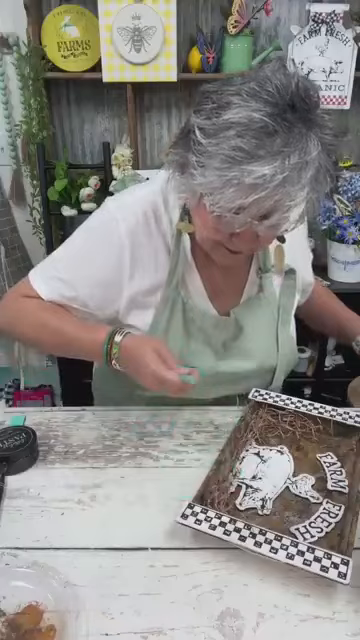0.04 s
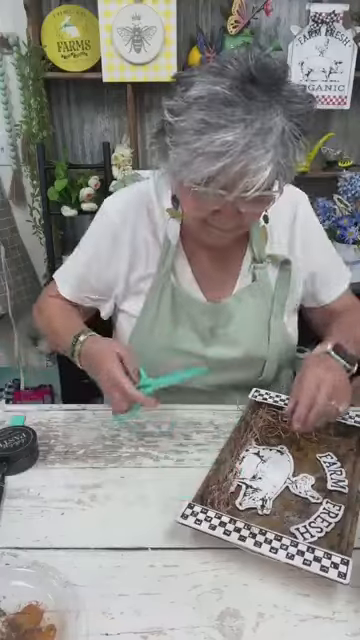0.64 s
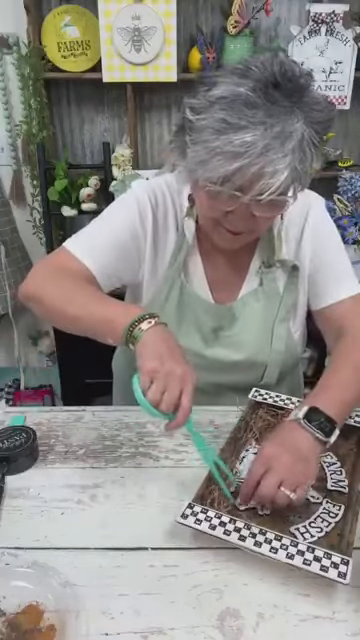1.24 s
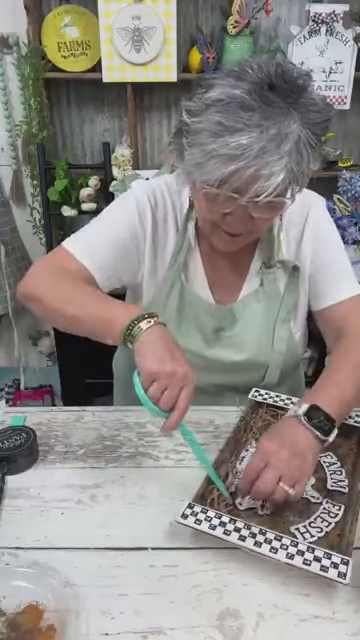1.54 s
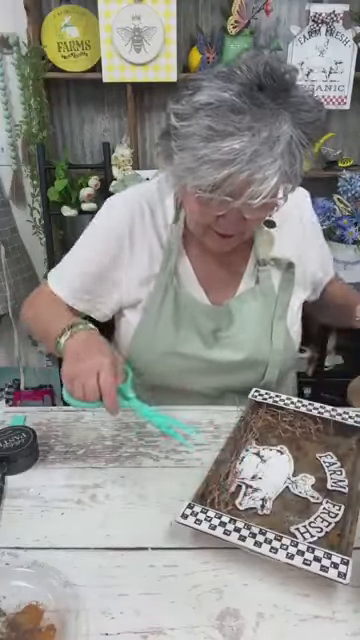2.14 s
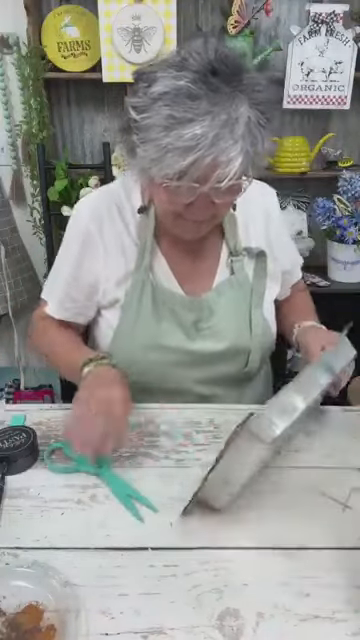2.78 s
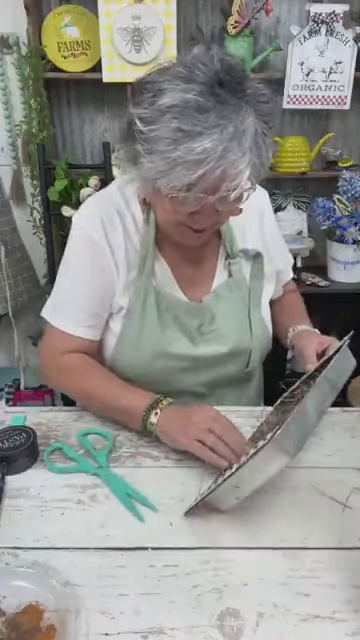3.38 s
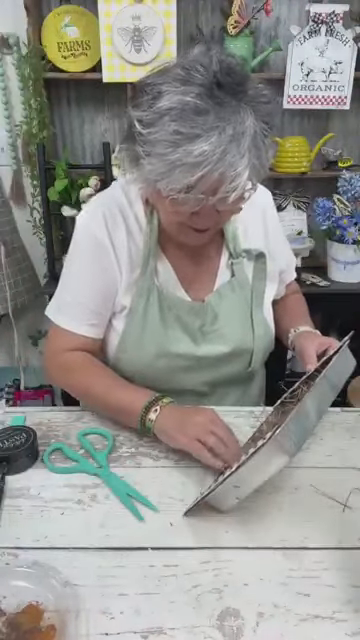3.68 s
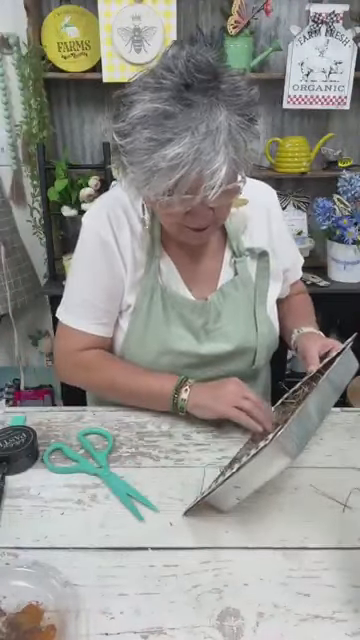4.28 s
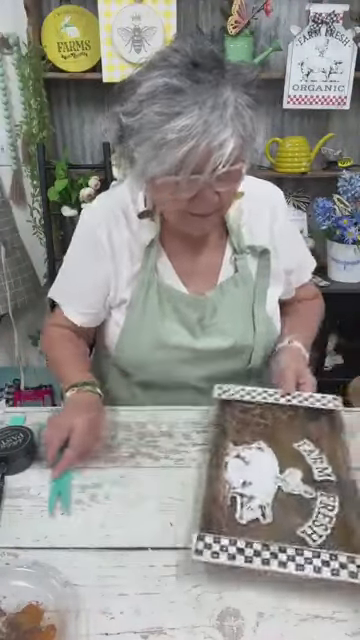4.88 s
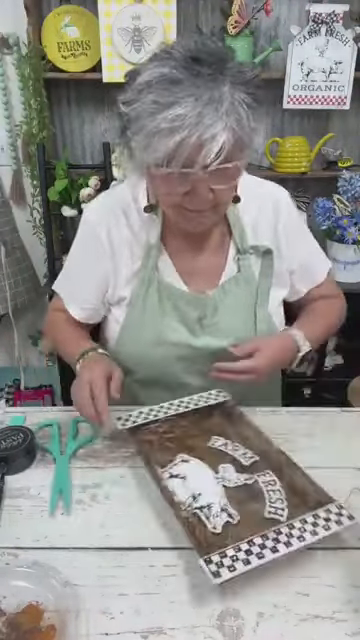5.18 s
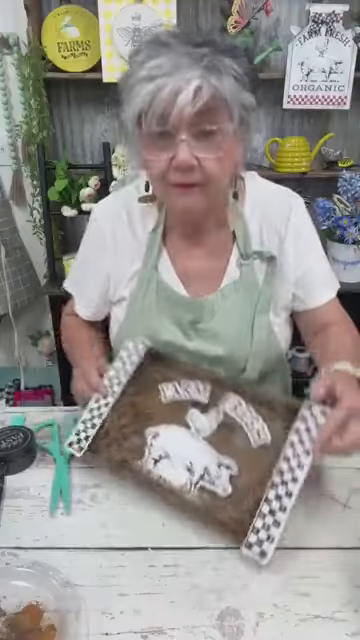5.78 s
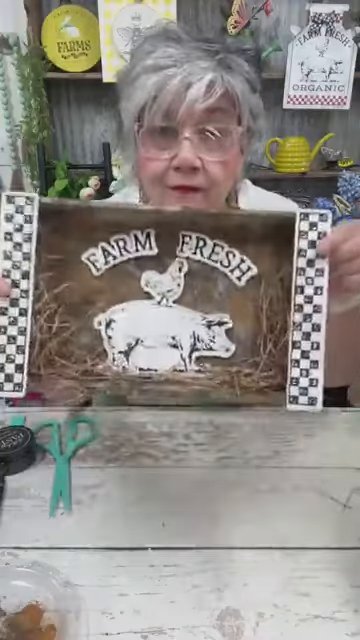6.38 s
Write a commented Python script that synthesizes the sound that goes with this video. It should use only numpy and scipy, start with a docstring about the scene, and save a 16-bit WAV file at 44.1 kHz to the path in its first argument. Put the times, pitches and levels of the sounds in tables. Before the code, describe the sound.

A sharp scissor snip and faint straw rustling, followed by a metal pan clattering on a wooden table in a small room.

```python
"""Craft scissors click open amid faint rustling, snip once and are put down on a wooden table.
A straw-lined metal baking pan is tipped on its edge, brushed out by hand, dropped flat with a clatter
and picked up. Impacts excite the damped modes of blades, pan and table; sliding friction makes the
noise of hands, sleeves and the dragged rim. A fan hums faintly behind, and a small room reverberates."""
import sys
import numpy as np
from scipy import signal
from scipy.fft import rfft, irfft, next_fast_len
from scipy.io import wavfile
from scipy.ndimage import uniform_filter1d

SR = 44100
rng = np.random.default_rng(int(sys.argv[2]) if len(sys.argv) > 2 else 0)


def dump_mix(stems):
    """Bounce the given channels to the path in sys.argv[1] as a 16-bit WAV at rate SR."""
    frames = np.atleast_2d(stems).T  # one column per channel
    limited = np.clip(frames, -1, 1)  # hard clip at full scale
    pcm = np.round(limited * 32767).astype(np.int16)
    wavfile.write(sys.argv[1], SR, pcm)


N = 283602
T = np.arange(SR // 2) / SR  # time axis of one short event [s]

# spectrum of crackling straw: (frequency [Hz], level [dB])
STRAW_SPECTRUM = [(2500, -20.5), (5500, -1), (7500, -0.5), (10000, -6), (13000, -6)]
# spectrum of stick-slip scraping: (frequency [Hz], level [dB])
SCRAPE_SPECTRUM = [(410, -46), (700, -20), (1050, -11), (1380, -15.5), (1980, -9), (2360, -9),
                   (7830, -12.5), (13500, -32)]


def pan():
    """Impact on a thin plate: each knock excites bending modes, lower ones when the contact is soft."""
    # knocks on the table: (time [s], relative levels of sheet [dB], rim [dB], table [dB], crack [dB],
    # sheet centre frequency [Hz], clatter T60 [s])
    knocks = [(2.818, -41.5, -51.5, -47, -54, 540, 0.2), (2.863, -34, -38.5, -35, -36, 1120, 0.09),
              (2.892, -29, -15.5, -36.5, -13, 1030, 0.025), (2.903, -33.5, -20.5, -30, -32.5, 950, 0.013),
              (2.962, -32.5, -61, -41, -38.5, 580, 0.049), (4.778, -51, -52, -46, -43, 700, .06),
              (4.813, -38, -54, -44, -36.5, 910, 0.041), (4.915, -46.5, -57, -55, -44.5, 1030, 0.014),
              (4.9819, -8.5, -30, -45, -19, 1010, .036), (4.995, -18, -27, -24, -36.5, 970, .12),
              (5.008, -19.5, -23, -49, -21, 1000, 0.063), (5.036, -23.5, -36, -52, -30, 925, 0.086),
              (5.054, -20, -26, -34, -36, 930, 0.087), (5.135, -30, -38, -33, -54, 1020, 0.057),
              (5.146, -38.5, -40, -34, -29, 1100, 0.05), (5.23, -38.5, -45.5, -34, -55, 1000, 0.23),
              (5.249, -26.5, -45, -35, -37.5, 1090, 0.021), (5.254, -15, -38, -22, -27, 668, 0.039),
              (5.267, -26.5, -33, -63, -28, 486, 0.097), (6.096, -43, -58, -64.5, -48, 723, 0.071)]
    # the pan's clearest modes: (frequency [Hz], level [dB], T60 [s])
    modes = [(326, -16.5, 0.3), (422, -9, 0.45), (700, -15, 0.49), (790, 0.5, 0.1224), (880, -5, 0.16),
             (920, -12.5, 0.13), (992, -2, 0.24), (987, -2.5, 0.2), (1255, 2.5, 0.18), (1395, -0.5, 0.085),
             (1420, -6.5, 0.089), (1577, -17, 0.43), (1710, -12.5, 0.047), (1822, -6, 0.15),
             (1810, -9.5, 0.081), (2194, -8.5, 0.28), (2480, -17, 0.17), (3800, -13.5, 0.15)]
    # spectra of the sheet's crowded modes, the rim and the contact crack: (frequency [Hz], level [dB])
    sheet_spectrum = [(20, -47), (120, -29.5), (300, -11), (550, -10), (830, -1.5), (1050, -1),
                      (1300, -8.5), (1600, -7.5), (2100, -12), (3000, -19.5), (6000, -49.5)]
    rim_spectrum = [(800, -28.5), (2000, -1), (3300, 3.5), (4800, -3.5), (7000, -26), (13000, -42.5)]
    crack_spectrum = [(30, -43), (300, -10.5), (900, 6), (3500, -3.5), (5000, -4), (7000, -25),
                      (13000, -30)]
    straw_offset_db, straw_db_per_octave = -16.5, 17  # harder knocks rattle the straw more
    out = np.zeros(N)
    mode_hz, mode_db, mode_t60 = np.transpose(modes)
    for s, sheet_db, rim_db, table_db, crack_db, centre_hz, t60 in knocks:
        hardness = centre_hz / 1000
        attack = 1 - np.exp(-T * hardness ** 2 / 0.00018)  # soft contacts build up slowly
        colour = np.array(sheet_spectrum) * [hardness, 1]
        excited_db = mode_db + along(colour, mode_hz) - along(sheet_spectrum, mode_hz)
        tones = amp(-9.5) * hardness ** 3 * ring(mode_hz, excited_db, mode_t60, scatter_db=2)
        sheet = burst(colour, attack * fade(t60)) + attack * tones
        rim = amp(rim_db - 3.5) * burst(rim_spectrum, attack * fade(0.69 * t60))
        straw_db = sheet_db + straw_offset_db + straw_db_per_octave * np.log2(hardness)
        straw = amp(straw_db) * burst(STRAW_SPECTRUM, attack * fade(1.7 * t60), spiky=0.55)
        crack = amp(crack_db) * burst(crack_spectrum, fade(0.0053))
        add(out, s, amp(sheet_db) * sheet + rim + straw + crack + amp(table_db + 1.5) * table_thump())
    # a low cut removes the deepest rumble from the knocks
    return filtered(out, lambda hz: (1j * hz / (38 + 1j * hz)) ** 2)


def scissors():
    """Contact excitation: the blades chatter briefly, then ring weakly, damped by the hand."""
    # opening, shutting, landing: (time [s], level [dB], chatter [s], tick re steel [dB], table [dB])
    contacts = [(.574, -36.5, 0.0033, -6, -86), (1.598, -18, 0.0031, -10, -62),
                (2.813, -30.5, 0.0045, 1.5, -30)]
    # blade modes: (frequency [Hz], T60 [s], level on opening [dB], shutting [dB], landing [dB])
    modes = [(1910, 0.065, -40, -24.5, 5.5), (2120, 0.063, -27, -17.5, -5),
             (2440, 0.055, -25, -17.5, -13.5), (3128, 0.094, -0.5, -27.5, -7), (3470, .06, -9, -10, -19.5),
             (4030, 0.03, -9, -19.5, 2), (5286, .035, -2, -8, -6), (5610, 0.052, -10, -20, -8),
             (5966, 0.1, -2, -20, -15.5), (6670, .13, -7, -2, -13.5), (7040, 0.056, -13, -2.5, -8.5),
             (6860, .12, -8, -8, -18.5), (7775, 0.16, -7, -9.5, -12.5), (7900, .06, -14, -9, -20.5),
             (8730, .09, -23, -12.5, -20), (10100, .03, -17, -19.5, -1.5)]
    # spectrum of the blade contact: (frequency [Hz], level [dB])
    tick_spectrum = [(200, -24), (600, -6.5), (900, -1.5), (3000, 2.5), (8000, -2.5), (11500, 1),
                     (13500, -17)]
    out = np.zeros(N)
    hz, t60, *strengths = np.transpose(modes)
    for (s, db, chatter_s, tick_db, table_db), mode_db in zip(contacts, strengths):
        contact = (1 - np.exp(-T / 0.0004)) / (1 + (T / chatter_s) ** 4)
        after_ring = amp(-30) * fade(0.25)
        steel = ring(hz, mode_db, t60, scatter_db=1) * (contact + after_ring)
        steel = unit(steel) * np.sqrt(np.mean(contact ** 2))  # the modes share the energy of the blow
        tick_tail = amp(-23.5) * fade(0.23)  # a faint, short, noisy decay after each click
        tick = amp(tick_db) * burst(tick_spectrum, contact + tick_tail)
        add(out, s, amp(db) * (steel + tick) + amp(table_db) * table_thump())
    return out


def table_thump():
    """Modal response: the struck table top swings up over a few milliseconds and booms."""
    # modes of the wooden top: (frequency [Hz], level [dB], T60 [s])
    modes = [(123, -19.5, 0.088), (166, -5.5, 0.1), (181, 2.5, 0.09), (207, -6, 0.046),
             (255.4, -16.5, 0.16), (358, -12.5, 0.075), (431.3, -9, 0.086), (626, -7.5, 0.063)]
    boom = sum(amp(db) * np.sin(2 * np.pi * hz * T) * fade(t60) for hz, db, t60 in modes)
    return boom * (1 - np.exp(-T / 0.0044)) ** 2


def pan_drag():
    """Stick-slip friction: the pan's edge scrapes along and makes the boards judder."""
    # drags: (peak time [s], relative levels of judder [dB], scrape [dB], rise [s], fall [s])
    drags = [(2.92, -33.5, -62, 0.016, 0.036), (2.96, -35.5, -58, 0.034, 0.058),
             (3.005, -42, -66, 0.033, 0.087), (4.78, -39.5, -52, 0.034, 0.014),
             (4.826, -39, -44.5, 0.041, 0.068), (5.09, -31, -55.5, 0.12, 0.075),
             (5.14, -60, -53, 0.017, 0.024), (5.225, -48, -53.5, 0.045, .03)]
    # spectrum of the juddering boards: (frequency [Hz], level [dB])
    judder_spectrum = [(29, -45.5), (50, -25.5), (119, -11.5), (180, 7), (240, -5), (330, -1.5), (400, -10),
                       (570, -6), (750, -19), (1050, -14), (1400, -28), (2600, -49.5)]
    judder_gain, scrape_gain = stroke_gains(drags)
    scrape = shifting(noise(SCRAPE_SPECTRUM, size=N, spiky=0.5), depth_db=2.5)
    judder = noise(judder_spectrum, size=N)
    return amp(-6) * judder_gain * judder + amp(-1) * scrape_gain * scrape


def finger_sweeps():
    """Sliding friction: quick finger strokes brush the pan and rock it against the table."""
    # sweeps: (peak time [s], level [dB], rise by 20 dB [s], table level [dB])
    sweeps = [(3.706, -49.5, 0.026, -60), (3.883, -47, 0.013, -52), (4.249, -43.5, .023, -46.5),
              (4.393, -47, 0.01, -42.5)]
    # spectrum of the brushed pan: (frequency [Hz], level [dB])
    brush_spectrum = [(100, -34.5), (300, -15), (560, -7), (920, 0), (1330, -2), (1800, -4), (3600, -11),
                      (4900, -14.5), (12000, -23.5), (13500, -28)]
    lead_s, fall_s = 0.1, 0.039  # start ahead of the peak; time to fall by 20 dB
    out = np.zeros(N)
    for s, db, rise_s, table_db in sweeps:
        envelope = 10 ** -np.maximum((lead_s - T) / rise_s, (T - lead_s) / fall_s)
        brush = shifting(noise(brush_spectrum, size=len(T), spiky=0.18), depth_db=4.5)
        add(out, s - lead_s, amp(db) * envelope * brush)
        add(out, s - 0.003, amp(table_db) * table_thump())
    return out


def scratches():
    """Resonant filtering: blades and nails slip on paper and straw, whose resonance colours the noise."""
    # scratches: (peak time [s], level [dB], resonance [Hz], half-width [s])
    events = [(0.082, -75, 5750, 0.0065), (0.927, -63, 2200, 0.0051), (0.964, -64, 3980, 0.0099),
              (1.57, -57, 3970, 0.0087), (1.758, -59.5, 4000, 0.018), (2.499, -58.5, 1770, 0.0036),
              (2.578, -55, 1746, .02), (3.759, -68.5, 3400, 0.007), (4.446, -61.5, 3250, 0.003)]
    out, lead_s = np.zeros(N), 0.1
    for s, db, centre_hz, width_s in events:
        slips = noise(SCRAPE_SPECTRUM, size=len(T), spiky=0.8)
        coloured = filtered(slips, lambda hz: 0.15 + 1 / (1 + 4j * (hz / centre_hz - centre_hz / (hz + 1))))
        envelope = np.exp(-((T - lead_s) / width_s) ** 2)
        add(out, s - lead_s, amp(db) * unit(coloured) * envelope)
    return out


def hand_rustle():
    """Roughness noise: a stroking hand rubs paper and sets off tiny contacts in the straw; the stroke at 0.568
    s is the scissor blades sliding just before they click open."""
    # strokes: (peak time [s], relative levels of rub [dB], crackle [dB], rise [s], fall [s])
    strokes = [(.09, -75, -67.5, 0.022, 0.014), (.365, -77, -68.5, .15, 0.064),
               (.5, -79, -75, 0.076, 0.046), (.568, -62, -62, 0.013, 0.016),
               (.86, -74.5, -77, 0.072, 0.043), (.966, -65, -62.5, 0.068, 0.022),
               (1.562, -64, -61.5, 0.095, 0.051), (1.752, -74, -68.5, 0.029, 0.16),
               (2.51, -67, -71, 0.019, 0.069), (2.578, -65, -70, 0.07, 0.095), (2.79, -65, -74, 0.15, 0.09),
               (3.378, -64, -72, 0.097, 0.1), (3.526, -74.5, -80, 0.017, 0.089),
               (3.764, -64, -69.5, 0.032, 0.068), (4.755, -62.5, -65.5, 0.088, .05),
               (4.93, -57.5, -62.5, .07, .1), (5.38, -57, -65.5, 0.2, 0.11),
               (5.638, -80.5, -71, 0.11, 0.048), (5.73, -78, -79, .025, 0.089),
               (5.89, -61.5, -65.5, .22, 0.2), (6.14, -64.5, -67, .04, 0.089),
               (6.276, -65.5, -75, 0.082, 0.057), (6.36, -68, -76, 0.048, 0.12)]
    # spectrum of rubbed paper: (frequency [Hz], level [dB])
    paper_spectrum = [(250, 1.5), (600, 0), (1200, 4.5), (2000, -0.5), (3800, -3), (6000, -12),
                      (12000, -31.5)]
    rub_gain, crackle_gain = stroke_gains(strokes)
    straw = shifting(noise(STRAW_SPECTRUM, size=N, spiky=0.5), depth_db=3)
    paper = shifting(noise(paper_spectrum, size=N, spiky=0.45), depth_db=3.5)
    return amp(0.5) * rub_gain * paper + amp(-2.5) * crackle_gain * straw


def sleeves():
    """Cloth friction: a sleeve swishes softly with each reach of an arm."""
    # reaches: (peak time [s], level [dB], rise and fall [s])
    reaches = [(.38, -71, .3), (1.32, -75, .3), (2.33, -72.5, 0.13), (3.2, -71, 0.13), (5.85, -67.5, 0.38)]
    # spectrum of sliding cloth: (frequency [Hz], level [dB])
    cloth_spectrum = [(300, -14), (700, -7.5), (1030, 3.5), (1400, -14), (2200, -18), (6000, -37)]
    motion = sum(amp(db) * swell(s, length, length) for s, db, length in reaches)
    return motion * shifting(noise(cloth_spectrum, size=N), depth_db=4.5)


def fan():
    """Broadband flow noise, with the tonal hum of a motor and a narrow-band whine."""
    # spectrum of the moving air, and the motor's tones: (frequency [Hz], level [dB])
    air_spectrum = [(15, -59), (25, -34), (48, -31), (63, -15), (119, -5), (147, -14), (237, -9.5),
                    (781, -24.5), (1020, -25), (1470, -26), (1600, -42), (1820, -33), (3180, -39),
                    (12600, -49), (14000, -52.5)]
    motor_tones = [(120, -73), (241, -81), (295, -79.5)]
    whine_hz, width_hz = 1428, 17
    t = np.arange(N) / SR
    hum = sum(amp(db) * np.sqrt(2) * np.sin(2 * np.pi * (hz * t + rng.random())) for hz, db in motor_tones)
    whine = filtered(rng.standard_normal(N), lambda hz: 1 / (1 + ((hz - whine_hz) / width_hz) ** 2))
    return amp(-70.5) * noise(air_spectrum, size=N) + hum + amp(-80.5) * unit(whine)


def room(x):
    """Diffuse reverberation: a tail, thin in the bass, in which each frequency decays at its own rate."""
    # reverberation times: (frequency [Hz], T60 [s])
    decay_times = [(150, 0.72), (600, 0.31), (2000, 0.3), (7000, 0.25), (13000, 0.19)]
    hz, t, bands = signal.stft(rng.standard_normal(SR), SR, nperseg=256)
    bass_cut = (hz / (hz + 200))[:, None]
    decay = np.exp(-np.log(1000) * t / along(decay_times, hz)[:, None])
    tail = signal.istft(bands * bass_cut * decay, SR, nperseg=256)[1][:len(T)]
    tail *= 1 - np.exp(-T / 0.00067)
    return signal.fftconvolve(x, tail / np.linalg.norm(tail))[:N]


def ring(hz, db, t60, scatter_db):
    """Modal superposition: damped sines at new strengths for every blow, starting at rms 1."""
    gain = amp(db + scatter_db * rng.standard_normal(len(db)))[:, None]
    phase = 2 * np.pi * rng.random(gain.shape)
    modes = gain * np.sin(2 * np.pi * hz[:, None] * T + phase) * fade(t60[:, None])
    return np.sum(modes, axis=0) / np.sqrt(np.sum(gain ** 2) / 2)


def burst(spectrum, envelope, spiky=0):
    """Modal overlap: crowded modes merge into noise that carries the energy of its envelope."""
    x = noise(spectrum, size=len(T), spiky=spiky) * envelope
    return unit(x) * np.sqrt(np.mean(envelope ** 2))


def noise(spectrum, size, spiky=0):
    """Coloured noise of rms 1; spiky makes it a crowd of tiny contacts of unequal strength."""
    grains = np.repeat(rng.standard_normal(size // 32 + 1), 32)[:size]
    excitation = rng.standard_normal(size) * np.exp(spiky * grains)
    return unit(filtered(excitation, lambda hz: amp(along(spectrum, hz))))


def shifting(x, depth_db):
    """Moving excitation point: resonances come and go at random as the touched spot moves."""
    bands = signal.stft(x, nperseg=512)[2]
    field = uniform_filter1d(rng.standard_normal(bands.shape), size=5, axis=0)  # smooth in frequency
    field = uniform_filter1d(field, size=12, axis=1)  # and in time
    return unit(signal.istft(bands * amp(depth_db * unit(field)), nperseg=512)[1][:len(x)])


def swell(s, rise, fall):
    """Stroke envelope: peaks at s seconds and is 20 dB down rise seconds before and fall seconds after."""
    t = np.arange(N) / SR - s
    distance = np.maximum(-t / rise, t / fall)
    return 10 ** -np.minimum(distance ** 1.6, 10)  # exponent 1 gives a pointed peak, 2 a bell


def stroke_gains(rows):
    """Summed stroke envelopes: one gain curve for each of the two level columns."""
    return sum(np.outer(amp(levels_db), swell(s, rise, fall)) for s, *levels_db, rise, fall in rows)


def fade(t60):
    """Exponential decay from 1, by 60 dB in t60 seconds."""
    return np.exp(-np.log(1000) * T / t60)


def filtered(x, response):
    """Linear filtering: the spectrum of x times a frequency response."""
    n = x.shape[-1]
    padded = next_fast_len(n + 8192)
    return irfft(rfft(x, padded) * response(np.fft.rfftfreq(padded, 1 / SR)), padded)[..., :n]


def along(points, hz):
    """Interpolation of (frequency [Hz], value) points on a logarithmic axis."""
    point_hz, values = np.transpose(points)
    return np.interp(np.log(hz + 1), np.log(point_hz + 1), values)


def amp(db):
    """Decibels to gain."""
    return 10 ** (np.asarray(db) / 20)


def unit(x):
    """Normalisation to rms 1."""
    return x / np.sqrt(np.mean(x ** 2) + 1e-20)


def add(track, s, sound):
    """Superposition of a sound on a track at s seconds."""
    start = max(round(s * SR), 0)
    track[start:start + len(sound)] += sound[:N - start]


def scene():
    """Mid-side stereo: every source sits in the middle and only the treble spreads."""
    # stereo spread: (frequency [Hz], side gain [dB])
    spread = [(2000, -69), (3200, -47.5), (4500, -22.5), (8000, -11.5), (13000, -13)]
    direct = scissors() + pan() + finger_sweeps() + scratches() + hand_rustle() + pan_drag() + sleeves()
    mid = direct + amp(-8.5) * room(direct) + fan()
    side = filtered(amp(-1) * room(direct) + amp(-4) * mid, lambda hz: 1j * amp(along(spread, hz)))
    return np.array([mid + side, mid - side])


def record(dry):
    """Band limiting: a steep low-pass removes the highest treble."""
    cutoff_hz = 13200
    return filtered(dry, lambda hz: 1 / np.sqrt(1 + (hz / cutoff_hz) ** 120))


dry = scene()
out = record(dry)
dump_mix(out)
```